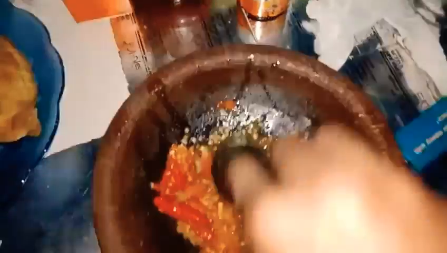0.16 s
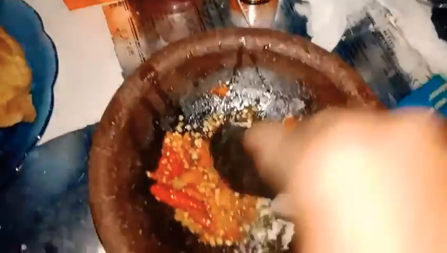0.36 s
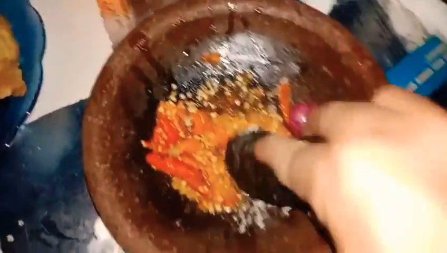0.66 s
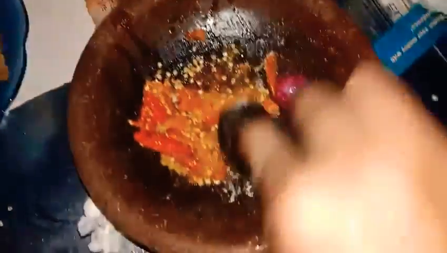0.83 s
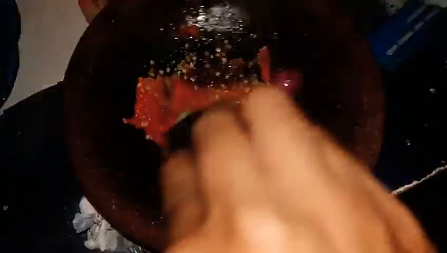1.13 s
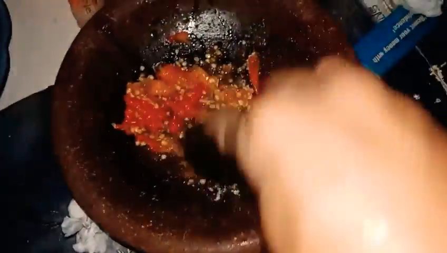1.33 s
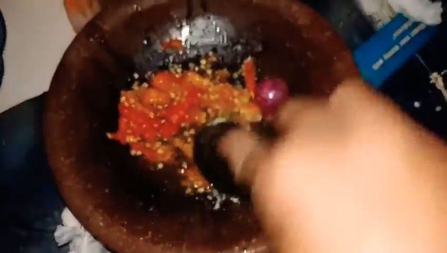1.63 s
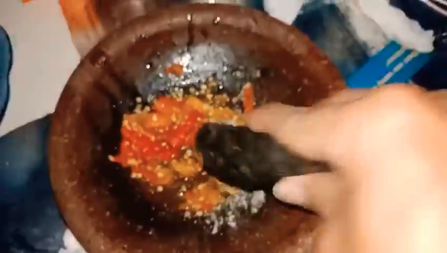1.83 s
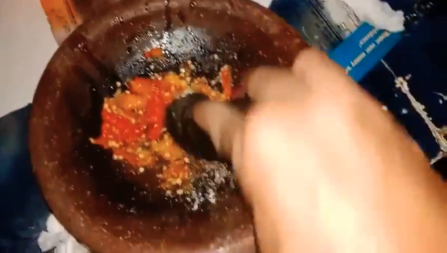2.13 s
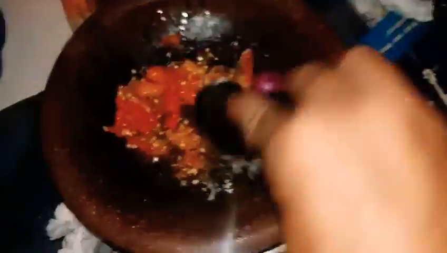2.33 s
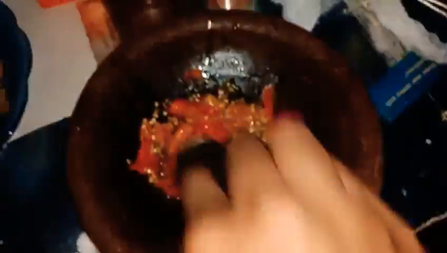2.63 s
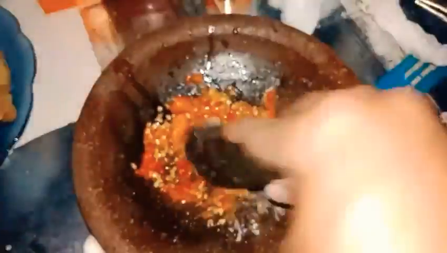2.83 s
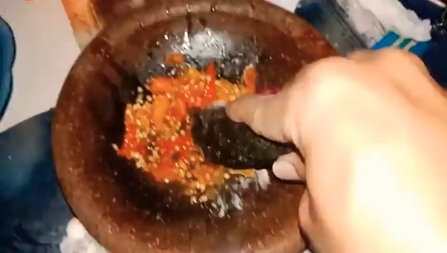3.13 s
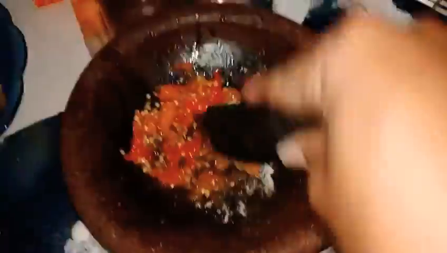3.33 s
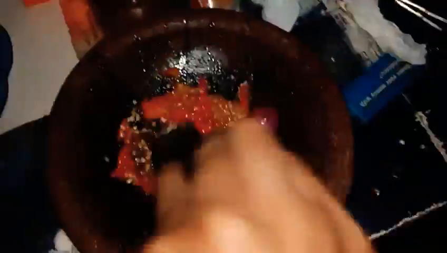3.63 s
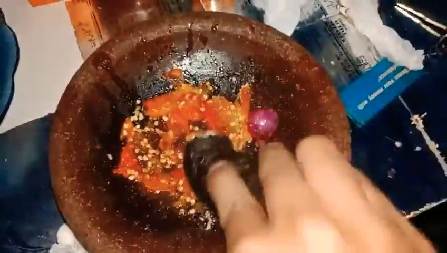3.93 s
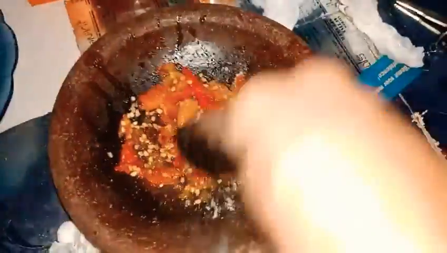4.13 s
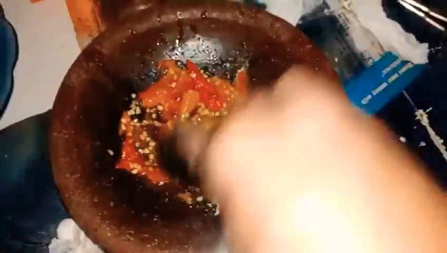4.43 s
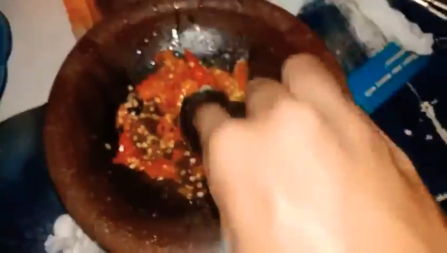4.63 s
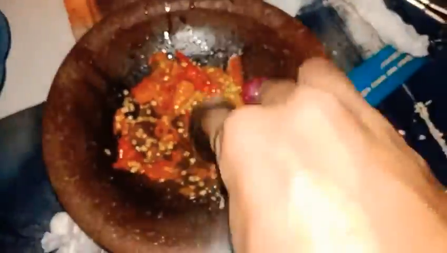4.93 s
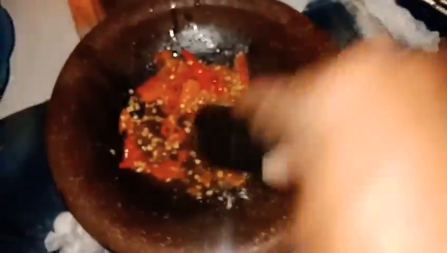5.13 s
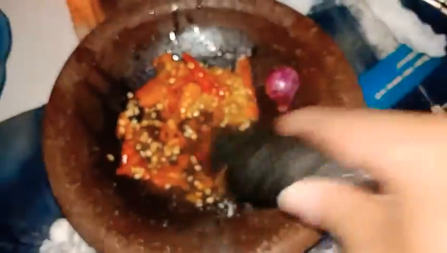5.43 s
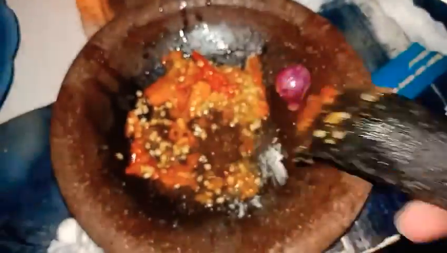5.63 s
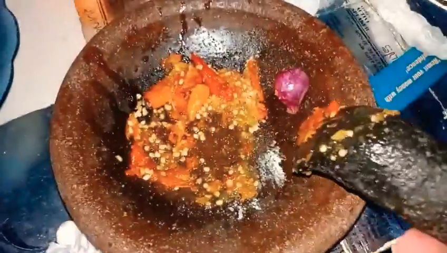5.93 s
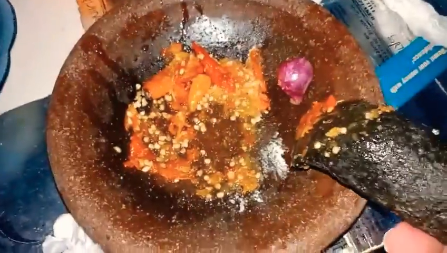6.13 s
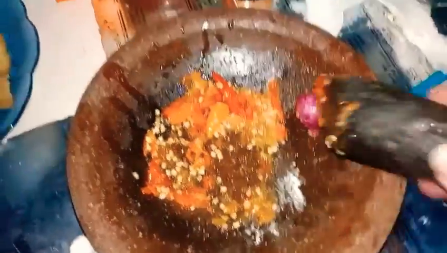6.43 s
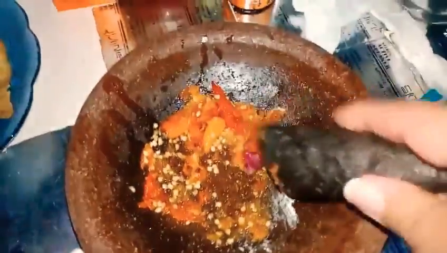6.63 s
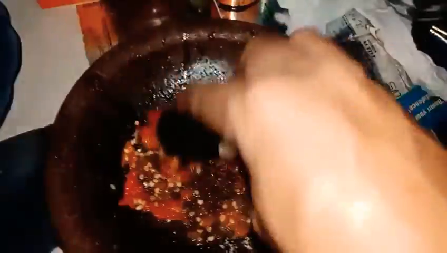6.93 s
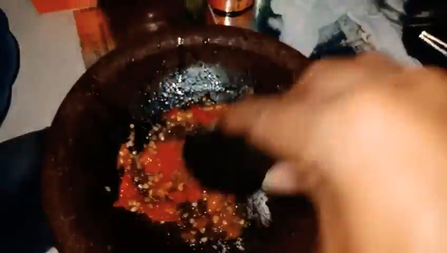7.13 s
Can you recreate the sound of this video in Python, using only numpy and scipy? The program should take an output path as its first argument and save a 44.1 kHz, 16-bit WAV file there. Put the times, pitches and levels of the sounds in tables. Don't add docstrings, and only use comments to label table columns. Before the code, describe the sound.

In a home kitchen, a pestle knocks and scrapes through wet chillies and seeds, strong at first, with lighter smearing between pushes. Grit crunches, the clay bowl and table thump, paste hisses and spits. After a last firm knock the grinding pauses; dull fumbling pops are heard on the left, then soft scrapes. Handheld stereo close up, brighter at right, short hard-surface reflections, low room noise and wavering hum.

```python
import sys
import numpy as np
from scipy import signal
from scipy.fft import rfft, irfft, next_fast_len
from scipy.io import wavfile
from scipy.ndimage import uniform_filter1d

SR = 44100
rng = np.random.default_rng(int(sys.argv[2]) if len(sys.argv) > 2 else 0)


def convert_level_to_amplitude(level_db):
    exponent = np.asarray(level_db, float) / 20
    return 10 ** exponent


def persist_wave(psi):
    counts = np.round(np.clip(psi, -1, 1) * 32767).astype(np.int16)
    wavfile.write(sys.argv[1], SR, np.atleast_2d(counts).T)


N = 320663

# [f/Hz, width/Hz, level/dB]
TABLE_MODES = [(109, 72, -9), (151.1, 43.8, 0.5)]
# [f/Hz, width/Hz, level/dB]
BOWL_MODES = [(250, 66.4, -1), (315, 34.4, 3.5), (391.7, 43.3, -5.5), (577.6, 78, -15.5)]
# [f/Hz, width/Hz, level/dB]
RIM_MODES = [(1120, 397, -2), (1464, 250, -3), (1727, 90, -8), (2745, 142, -2), (2922, 304, -9),
             (3170, 205, -1.5), (3400, 247, -3), (3540, 460, -8), (4210, 310, -12), (4685, 310, -4),
             (5380, 230, -14)]
# [t/s, f/Hz]
CONTACT = [(0.25, 3050), (0.42, 3140), (0.71, 3000), (0.8, 3100), (1.1, 3300), (1.19, 3900), (1.26, 3300),
           (2.4, 3060), (2.65, 2800), (2.82, 3380), (4.09, 3140), (4.23, 2860), (4.32, 3110), (5.36, 3200),
           (5.41, 4200), (5.46, 3250), (6.65, 4600), (7.0, 2990)]
# [f/Hz, level/dB per Hz]
PASTE = [(500, -8.5), (800, -13.5), (2000, -5), (4840, -2.5), (6550, -12.5), (7800, -13), (10000, -29.5),
         (11000, -35), (14500, -35.5), (15500, -53)]


def grinding():
    press_db, scrape_db, hiss_db, boom_db = strokes()
    stall_db = stalls()
    judder = walk(60)
    slips = band(grit(400, spread_db=0.5, judder_db=0.52 * judder), 81, 1200)
    fine = band(grit(3500, spread_db=3.0, judder_db=2.0 * judder), 440, 4500)

    def shake(db, modes, patchy_db):
        return body(slips * convert_level_to_amplitude(db), modes, patchy_db) / np.std(body(slips[:2 * SR], modes))

    table = shake(boom_db, TABLE_MODES, patchy_db=2.26)
    bowl = shake(press_db + 1.0, BOWL_MODES, patchy_db=2.0)

    bearing_hz = np.interp(np.arange(N) / SR, *np.transpose(CONTACT))
    scraped = fine * convert_level_to_amplitude(scrape_db + stall_db + 6.5)
    rim = body(scraped, RIM_MODES, patchy_db=3.0, rate=40, near_hz=bearing_hz)
    rim = rim / np.std(body(fine[:2 * SR], RIM_MODES))

    wet = colour(grit(9000, spread_db=2.5, judder_db=1.7 * judder), PASTE)
    paste = np.zeros(N)
    for hz in 400 * 1.4 ** np.arange(11):
        paste += convert_level_to_amplitude(2.0 * walk(30)) * band(wet, hz, 1.293 * hz)
    paste = paste / np.std(band(paste, 6000, 11000))
    return table + bowl + rim + paste * convert_level_to_amplitude(hiss_db + stall_db + 1.5 + 3.1 * walk(26))


# [t/s, held/s, pressure level/dB, scrape level/dB relative, wet hiss level/dB relative]
LANDINGS = [(.196, 0.004, -29.5, -11.5, -27.5), (.44, 0.045, -34.5, -4, -32),
            (.58, 0.036, -38.5, -5.5, -31), (1.178, 0.068, -24, -1.5, -22), (1.51, 0.012, -49, 1, -6.5),
            (2.052, 0.059, -24.5, -3, -23), (2.4, 0.011, -24, 4, -14.5), (3.058, 0.069, -24.5, -2.5, -22.5),
            (4.6, 0.08, -44.5, -14, -18), (4.906, 0.046, -29, -4.5, -18), (5.402, 0.01, -23.5, -17, -31.5)]
PUSHES = [(0.0, .01, -49, -4, -25), (.255, 0.048, -23, -4.5, -25.5), (.35, 0.077, -36, -5, -24),
          (.635, 0.031, -26, -1.5, -18.5), (.8, 0.069, -35.5, -4.5, -24), (.885, 0.039, -21, -5, -25.5),
          (1.27, 0.025, -39, -5, -15), (1.555, 0.012, -27.5, -5, -20.5), (1.655, 0.041, -31, -2.5, -19),
          (1.79, 0.069, -35, -4.5, -18.5), (2.1, 0.076, -20.5, -1, -22.5), (2.3, 0.038, -32, -1.5, -17.5),
          (2.43, 0.015, -28.5, -5, -19.5), (3.2, 0.091, -40, -4, -18), (3.385, 0.01, -24, -4.5, -21.5),
          (3.69, 0.03, -41.5, -4.5, -21), (4.07, 0.041, -32.5, -1.5, -19.5), (4.22, 0.02, -37.5, -1.5, -14),
          (4.385, 0.01, -29.5, -3, -18.5), (4.66, 0.095, -45.5, -0.5, -16), (4.795, 0.056, -42.5, -4, -19),
          (5.07, 0.0077, -31.5, -2.5, -18), (5.16, 0.029, -29, 1.5, -19.5), (5.46, 0.021, -28, 0, -25)]
SMEARS = [(.77, .01, -42, -1.5, -10.5), (1.41, 0.025, -52, -2, -7.5), (2.7, 0.1, -52, -1, -8),
          (2.845, 0.0058, -44.5, -1.5, -12), (2.93, 0.072, -55, -7, -5), (3.3, 0.072, -48.5, 4.5, -13.5),
          (3.6, 0.094, -60, 0.5, -9), (3.79, 0.018, -56, -11, -4), (3.87, 0.055, -56, 0.5, -11.5),
          (3.95, 0.038, -53, -8, -5.5), (4.32, 0.038, -44.5, -4, -15.5), (5.27, 0.053, -64, -8, -6.5),
          (6.64, 0.042, -56, 0, -4.5), (6.95, 0.045, -56, -6, -30), (7.02, 0.036, -58, 9.5, -5.5),
          (7.09, 0.036, -51, 0, -13), (7.22, .05, -64, 2.5, -12)]


def strokes():
    power = np.full((4, N), 1e-14)
    # strokes, rise in dB per s, fall in dB per s, table boom in dB relative
    kinds = ((LANDINGS, 3000, 480, -3.6), (PUSHES, 494, 379, -1.7), (SMEARS, 410, 335, 4.1))
    for rows, rise, fall, boom_db in kinds:
        for s, held, db, scrape_db, hiss_db in rows:
            first = max(int(s * SR) - SR // 4, 0)
            span = np.arange(first, min(int(s * SR) + SR // 2, N))
            t = span / SR - s
            shape_db = db + np.minimum(0, np.minimum(rise * t, fall * (held - t)))
            layers_db = np.array([[0], [scrape_db], [hiss_db], [boom_db]])
            power[:, span] += convert_level_to_amplitude(shape_db + layers_db) ** 2
    return 10 * np.log10(power)


def stalls():
    stall_s, stall_db = 0.008, -4
    ahead = blows(np.transpose(SNAPS)[0] - stall_s / 2, 0)
    k = max(int(stall_s * SR), 1)
    return stall_db * np.minimum(uniform_filter1d(ahead, k) * k, 1)


# [t/s, peak level/dB, click level/dB relative, thud f/Hz]
KNOCKS = [
    (0.197, -13.5, -31, 315),
    (0.579, -16, -42, 126),
    (1.176, -7, -13.5, 228),
    (2.052, -17, -27, 134.5),
    (2.071, -8.5, -24, 157),
    (2.401, -18.5, -14, 263),
    (3.067, -36, 1, 138),
    (4.586, -22, -37.5, 136),
    (4.916, -17, -11.5, 268),
    (5.398, -9.5, -11.5, 250),
]
# [t/s, peak level/dB, f/Hz, crack level/dB relative]
SNAPS = [(0.253, -15, 2790, -23), (0.4897, -22, 3730, -7), (0.5882, -34, 3250, -4),
         (0.7736, -25.5, 3060, -8), (0.8014, -23.5, 4820, -9), (0.8724, -22, 3200, -10),
         (0.915, -14, 4740, -16), (1.1754, -15.5, 3280, 1.5), (1.248, -13.5, 3230, -10),
         (1.5554, -23, 3200, -7), (2.0528, -19.5, 3430, 1), (2.162, -18, 3130, -1), (2.3083, -19, 3220, -8),
         (2.345, -14.5, 3170, -24), (2.4042, -8, 3170, -28), (3.0594, -26, 3650, -7),
         (3.0703, -14, 3250, -5), (3.303, -23, 3240, -14), (3.3702, -25, 3020, -18),
         (4.219, -23.5, 2800, -5), (4.35, -23.5, 3170, -20), (4.392, -37, 3100, -11),
         (4.7946, -25, 2880, -5), (4.8415, -28.5, 3310, -19), (4.91, -28, 3400, -14),
         (5.073, -19.5, 3320, -24), (5.157, -20, 3050, -19), (5.3988, -11.5, 1280, -33)]
# [f/Hz, width/Hz, level/dB]
STONE_MODES = [(900, 660, 7), (1280, 1150, 5.5), (1700, 320, 4), (3250, 300, -4.5), (4210, 76, 9.5),
               (5610, 100, -5)]


def pestle():
    s, db, click_db, hz = np.transpose(KNOCKS)
    thud = band(struck(s, db + 2.0, hz, t60=0.045), 77, 1500)
    thud += convert_level_to_amplitude(10.5) * body(band(blows(s, db), 90, 900), TABLE_MODES + BOWL_MODES)

    click = blows(s, db + click_db)
    settle = signal.lfilter([1], [1, -np.exp(-np.log(1000) / (0.2 * SR))], click)
    chatter = click + convert_level_to_amplitude(-28) * settle * grit(1500, spread_db=-1.0, judder_db=1.5 * walk(80))
    stone = convert_level_to_amplitude(33.0) * body(band(chatter, 600, 6600), STONE_MODES)
    stone += convert_level_to_amplitude(1.0) * band(click, 500, 7500)

    s, db, hz, crack_db = np.transpose(SNAPS)
    snap = band(struck(s, db + 6.0, hz, t60=0.012, rise_s=0.0003), 550, 6600)
    crack = band(blows(s, db + crack_db), 1000, 6700)
    return thud + stone + snap + convert_level_to_amplitude(8.5) * crack + convert_level_to_amplitude(22) * ring(crack, 4200, 510)


# [t/s, peak level/dB]
SMACKS = [
    (2.7437, -52),
    (2.7886, -56),
    (2.988, -41.5),
    (3.798, -64),
    (3.9657, -60),
    (4.2083, -40),
    (4.394, -47),
    (4.584, -53),
    (5.365, -52),
]


def smacks():
    burst = signal.lfilter([1], [1, -np.exp(-1 / (0.0027 * SR))], blows(*np.transpose(SMACKS)))
    return convert_level_to_amplitude(3) * band(burst * rng.standard_normal(N), 3000, 12000)


# [t/s, peak level/dB, pop f/Hz]
RUBS = [(5.948, -40, 250), (5.9594, -26, 184), (5.97, -26, 343), (5.9779, -21, 250), (5.9848, -22, 219),
        (6.0015, -32, 338), (6.058, -27, 151), (6.081, -38, 250), (6.092, -35, 218), (6.148, -31, 120),
        (6.172, -36, 403), (6.186, -40, 250)]
# [t/s, level/dB]
CREAK = [
    (5.92, -70),
    (5.98, -37),
    (6.014, -51),
    (6.042, -63),
    (6.094, -50),
    (6.11, -62),
    (6.186, -46.5),
    (6.22, -77),
]


def finger():
    s, db, hz = np.transpose(RUBS)
    pops = -struck(s, db + 5.5, hz, t60=0.016) - convert_level_to_amplitude(24) * band(blows(s, db), 400, 1200)
    creak = level(band(grit(250, spread_db=1.0, judder_db=1.4 * walk(70)), 110, 600), 0)
    creak = creak * convert_level_to_amplitude(curves([CREAK])[0] + 4.5)
    return band(pops + creak, 52, 5600)


def walls(x, t60, db):
    t = np.arange(SR // 3) / SR
    tails = rng.standard_normal((2, len(t))) * np.exp(-np.log(1000) * t / t60)
    tails = tails / np.sqrt(np.sum(tails[0] ** 2))
    return convert_level_to_amplitude(db) * signal.fftconvolve(x[None], tails, axes=1)[:, :N]


# [f/Hz, level/dB per Hz]
ROOM_NOISE = [(15, -50), (25, 3.5), (126, 1), (552, -10.5), (848, -3.5), (997, -12), (1340, -8.5),
              (1490, -11), (1850, -9), (2850, -13.5), (3090, -10.5), (3830, -15), (4260, -15),
              (6050, -25.5), (15500, -38)]
# [t/s, room level/dB, fridge hum level/dB]
KITCHEN_LEVELS = [(0.0, -59, -73), (0.17, -67.5, -86), (0.3, -55, -60), (2.4, -56.5, -58),
                  (2.64, -58.5, -92), (2.8, -58, -53.5), (4.4, -58.5, -58), (5.6, -57.5, -56.5),
                  (6.1, -55, -55.5), (6.26, -59.5, -73), (7.27, -58, -74)]
# [f/Hz, level/dB]
ROOM_SIDES = [(100, 0), (700, -2), (2400, -5.5), (4400, -11), (8000, -11), (15000, 8.5)]


def kitchen():
    room_db, hum_db = curves([KITCHEN_LEVELS])
    shared = colour(rng.standard_normal(N), ROOM_NOISE)
    own = colour(rng.standard_normal(N), ROOM_NOISE)
    left = colour(shared, [(150, -1.5), (1500, -19)]) + colour(own, [(100, -2.5), (1200, -2)])
    room = np.array([colour(left, ROOM_SIDES), shared]) / np.std(band(shared, 500, 2200))
    hum = level(ring(ring(rng.standard_normal(N), 125.6, 20.0), 133.7, 31.3), 0)
    return room * convert_level_to_amplitude(room_db - 2.0 + 1.38 * walk(5.2)) + hum * convert_level_to_amplitude(hum_db + 3.5)


def grit(rate, spread_db, judder_db):
    when, size, sign = rng.random(N), rng.exponential(size=N), rng.standard_normal(N)
    grains = (when < rate / SR) * sign * convert_level_to_amplitude(spread_db * size + judder_db)
    load = uniform_filter1d(grains ** 2, int(0.05 * SR))
    return grains / np.sqrt(load + 0.22 * np.mean(grains ** 2))


def blows(seconds, db):
    x = np.zeros(N)
    np.add.at(x, (np.asarray(seconds) * SR).astype(int), convert_level_to_amplitude(db))
    return x


def struck(seconds, db, hz, t60, rise_s=0.0001):
    x, t = np.zeros(N + SR), np.arange(SR // 10) / SR
    shape = (1 - np.exp(-t / rise_s)) * np.exp(-np.log(1000) * t / t60)
    for s, gain, f in zip(seconds, convert_level_to_amplitude(db), hz):
        start = int(s * SR)
        x[start:start + len(t)] += gain * np.sin(2 * np.pi * f * t) * shape
    return x[:N]


def ring(x, hz, width_hz):
    return signal.lfilter(*signal.iirpeak(hz, hz / width_hz, fs=SR), x)


def body(x, modes, patchy_db=0., rate=24, near_hz=None, far_db=9.5):
    total = 0
    for k, (hz, width_hz, db) in enumerate(modes):
        feed_db = db + patchy_db * walk(rate)[:len(x)]
        if near_hz is not None:
            feed_db = feed_db - far_db * np.minimum(np.abs(np.log(hz / near_hz)) / 0.18, 1)
        total = total + (-1) ** k * ring(x * convert_level_to_amplitude(feed_db), hz, width_hz)
    return total


def walk(rate):
    k = int(SR / rate)
    held = np.repeat(rng.standard_normal(N // k + 1), k)
    return 1.31 * uniform_filter1d(held, k)[:N]


def level(x, db):
    return x * convert_level_to_amplitude(db) / np.sqrt(np.mean(x ** 2))


def band(x, lo_hz, hi_hz):
    return signal.sosfilt(signal.butter(3, [lo_hz, hi_hz], "bandpass", fs=SR, output="sos"), x)


def colour(x, points, lag_s=0.):
    size = next_fast_len(N + 4096)
    f = np.arange(size // 2 + 1) * SR / size
    hz, db = np.transpose(points)
    gain = convert_level_to_amplitude(np.interp(np.log(f + 1), np.log(hz), db))
    return irfft(rfft(x, size) * gain * np.exp(-2j * np.pi * f * lag_s), size)[:N]


def curves(tables):
    t, out = np.arange(N) / SR, np.full((len(tables[0][0]) - 1, N), -120.)
    for rows in tables:
        s, *columns = np.transpose(rows)
        inside = (t >= s[0]) & (t <= s[-1])
        out[:, inside] = [np.interp(t[inside], s, c) for c in columns]
    return out


# [f/Hz, level/dB]
COVERED = [(60, -2), (250, -4.5), (500, -6), (1200, -19.5), (2400, -29.5), (3200, -27), (5000, -88),
           (6500, -92), (15000, -52)]


def scene():
    mortar, rub = grinding() + pestle() + smacks(), finger()
    echo = walls(mortar, t60=0.25, db=-13.5)
    reaching_left = mortar + colour(echo[0], [(300, -10.0), (2000, 13.0)])
    left = colour(reaching_left, COVERED, lag_s=0.00042)
    right = mortar + echo[1] + convert_level_to_amplitude(-32) * rub
    return np.array([left + rub, right]) + kitchen()


def roll_off(x):
    return signal.sosfilt(signal.butter(12, 15100, fs=SR, output="sos"), x)


def record(dry):
    mic = signal.sosfilt(signal.butter(2, 70, "highpass", fs=SR, output="sos"), dry)
    mic = np.tanh(mic) + convert_level_to_amplitude(-84.0) * rng.standard_normal(dry.shape)
    return roll_off(mic)


dry = scene()
out = record(dry)
persist_wave(out)
```